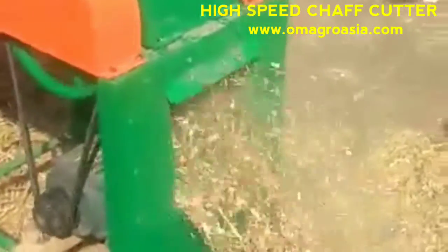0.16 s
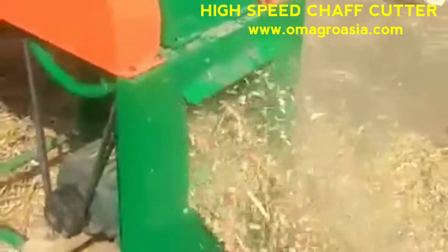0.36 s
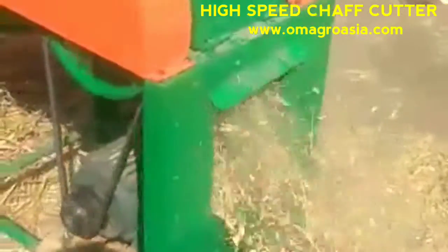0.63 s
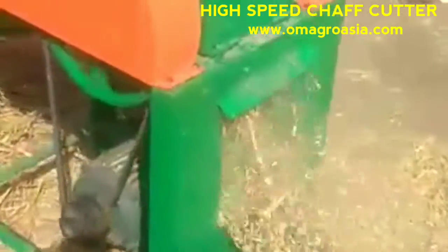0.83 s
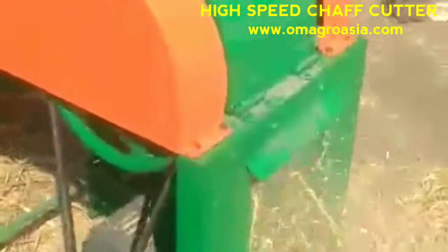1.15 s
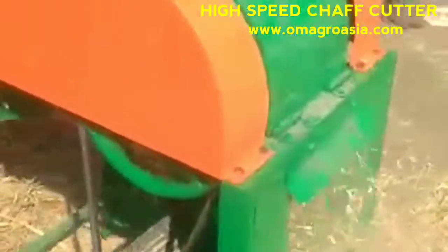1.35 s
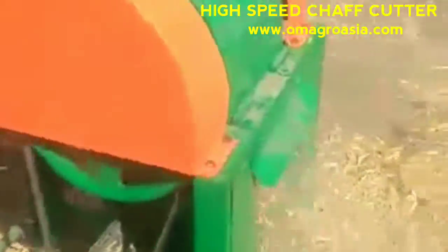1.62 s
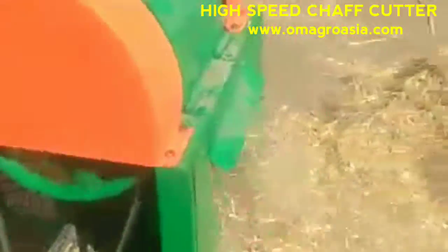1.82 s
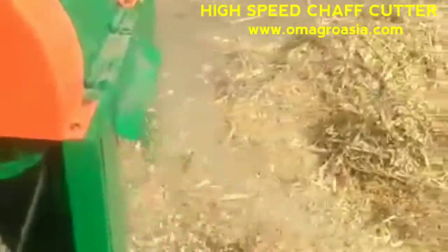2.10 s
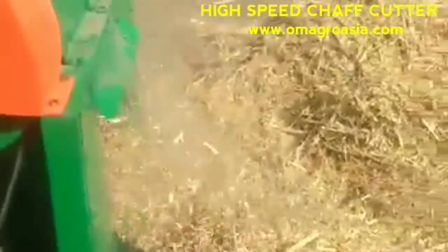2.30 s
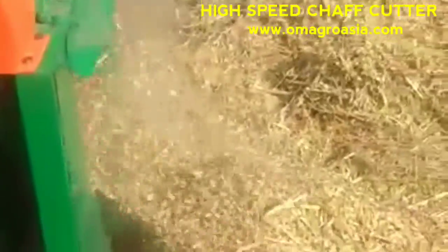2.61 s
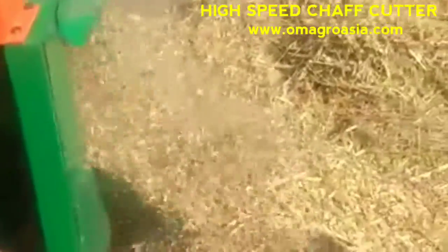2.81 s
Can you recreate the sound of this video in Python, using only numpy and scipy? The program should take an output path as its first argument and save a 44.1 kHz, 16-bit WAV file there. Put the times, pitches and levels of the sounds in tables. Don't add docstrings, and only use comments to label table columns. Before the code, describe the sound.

Farm chaff cutter running steadily, fast metallic chopping over airy straw blast and high whining belt

```python
import sys
import numpy as np
from scipy import signal
from scipy.fft import rfft, irfft
from scipy.io import wavfile
from scipy.ndimage import uniform_filter1d

SR = 44100
rng = np.random.default_rng(int(sys.argv[2]) if len(sys.argv) > 2 else 0)


def transcribe(signal):
    frames = np.atleast_2d(signal).T
    limited = np.clip(frames, -1, 1)
    pcm = np.round(limited * 32767).astype(np.int16)
    wavfile.write(sys.argv[1], SR, pcm)


def to_linear_factor(level_db):
    exponent = np.asarray(level_db, float) / 20
    return 10 ** exponent


N = 130095

# start_s, blow_db, load_db
KNIFE_A = [(0.0014, -20.5, 1.5), (0.1306, -23, 2.5), (0.2604, -24, 1.5), (0.3872, -26, 0.5),
           (0.515, -26.5, 2), (0.6459, -24, 0), (0.7754, -24, 3.5), (0.9063, -24.5, 0), (1.0339, -21.5, -3),
           (1.164, -28, 0), (1.2871, -24.5, -2), (1.42, -25.5, 1), (1.5468, -28, -0.5), (1.678, -23, -1),
           (1.8059, -24.5, -0.5), (1.935, -24.5, -0.5), (2.0646, -26.5, -0.5), (2.191, -36, 0),
           (2.321, -33, -0.5), (2.4544, -25.5, -2), (2.5806, -24.5, 1), (2.7111, -22.5, -2),
           (2.841, -30, 1.5)]
# start_s, blow_db, load_db
KNIFE_B = [(0.0647, -22, -3), (0.1929, -23, 0.5), (0.3242, -21, -0.4), (0.4539, -22, -3),
           (0.5839, -26, -1.5), (0.7121, -26, -1), (0.839, -26.5, -1.8), (0.9696, -25.5, -0.4),
           (1.098, -26, -2.8), (1.2253, -25, -3), (1.3551, -29, -2.1), (1.4845, -26, -2),
           (1.612, -30, -0.6), (1.7417, -31, -0.5), (1.8735, -31, -0.5), (1.9999, -25, -1.5),
           (2.1282, -25.5, 0.1), (2.2566, -24, -2.5), (2.381, -31, -3), (2.509, -28, -0.3),
           (2.6464, -27.5, -1.1), (2.7739, -25, -1.6), (2.908, -23.5, 0.3)]
# start_s, level_db
KNOTS = [(0.045, -32), (.152, -31), (.531, -33), (.552, -25.5), (0.68, -29.5), (.894, -33), (.932, -23.5),
         (1.124, -29), (1.314, -30), (1.461, -22.5), (1.592, -37), (1.911, -29), (2.047, -29), (2.231, -40),
         (2.357, -40), (2.425, -39), (2.496, -38)]
# time_s, load_db
FEED = [
    (0, 0.44),
    (.7, -0.2),
    (1.2, 1.5),
    (1.6, 1.74),
    (2.1, 2.5),
    (2.6, 2.5),
    (2.95, 0.9),
]
# freq_hz, level_db
BLOW_SPECTRUM = [(150, -29), (300, 3), (1000, 3), (1450, -4), (1750, -9.5), (6000, -24.5), (10000, -33.5),
                 (15500, -49)]
# freq_hz, t60_s
BLOW_DECAY = [(200, 0.2), (1000, 0.028), (4000, 0.12), (12000, 0.038)]
# freq_hz, level_db, t60_s
ANVIL_MODES = [(292.5, 2, 0.046), (419, -5.5, 0.052), (836, -6.5, 0.015), (999, -1, 0.03),
               (1174, -16.5, 0.04), (1410, -11.5, 0.016), (1797, -5, 0.031)]
# freq_hz, width_hz, level_db
CASING_MODES = [(100, 22, -26), (197, 28, -2.5), (228, 35, -4), (280, 16, 2.5), (318, 30, -1.5),
                (357, 30, -3.5), (420, 60, -2.5), (490, 26, -1.5), (560, 55, -7), (695, 65, -9),
                (790, 70, -10), (875, 80, -9.5), (975, 100, -12), (1100, 140, -16.5)]
# time_s, level_db
FACING = [
    (0, 0.5),
    (1.3, 0),
    (1.9, -1.5),
    (2.3, 0.5),
    (2.95, 2.5),
]
# middle_s, pitch_hz, level_db
PANEL_RINGS = [(0.149, 230, -30), (0.149, 316.3, -28.5), (0.269, 274, -29), (0.399, 275, -38),
               (0.529, 284, -32), (0.651, 300.6, -31), (0.659, 486, -36), (0.787, 289, -31.5),
               (.84, 282, -30), (.91, 286, -47), (1.171, 277, -28.5), (1.24, 318, -31), (1.559, 303, -38),
               (1.691, 317, -25.5), (1.81, 220, -38), (1.84, 194, -28), (1.93, 408.6, -29),
               (2.049, 191, -29), (2.12, 488, -23.5), (2.149, 314, -33), (2.171, 194, -27),
               (2.24, 492, -25.5), (2.281, 304, -29.5), (2.29, 195, -27.5), (2.37, 492, -29),
               (2.41, 215, -30.5), (2.5, 480, -26.5), (2.53, 202, -32), (2.609, 218, -33), (2.68, 189, -34),
               (2.72, 415, -35), (2.74, 224.6, -28), (2.85, 412, -37), (2.87, 229, -29)]
# middle_s, length_s, level_db, pitch_hz, overtone_gain_db
SQUEALS = [(.49, .08, -52, 3900, -3), (.63, 0.11, -53, 3996, -14), (.69, 0.073, -54, 3890, -7),
           (.92, 0.092, -55, 3965, -11), (.97, .04, -50.5, 3900, 19), (1.02, 0.058, -34.5, 3925, -1),
           (1.07, 0.057, -40, 3928, -2), (1.125, 0.079, -39.5, 3920, 2), (1.26, .06, -50, 3925, -7),
           (1.34, 0.092, -39.5, 3903, -7), (1.395, 0.025, -34.5, 4000, -4), (1.455, .07, -37, 3870, 0),
           (1.555, 0.088, -34, 3960, 1.5), (1.645, 0.11, -33, 3926, 3), (1.77, 0.034, -43, 3940, -11),
           (1.81, 0.032, -46, 3925, -9), (1.925, 0.076, -37.5, 3932, 14), (1.995, 0.055, -38, 3935, 9),
           (2.07, 0.098, -44, 3935, 5), (2.15, .04, -56, 3980, 3), (2.32, 0.064, -49, 3905, -5),
           (2.385, 0.078, -51, 3926, 0), (2.445, 0.036, -41, 3916, -5), (2.475, 0.022, -45, 3980, 6),
           (2.51, 0.04, -39.5, 3900, 3), (2.555, .03, -52, 3915, 0), (2.6, .04, -44, 3853, 0),
           (2.636, 0.023, -34, 3895, 0), (2.668, 0.032, -37, 3880, -7), (2.765, .06, -46, 3915, 13),
           (2.83, 0.031, -38.5, 3915, 0), (2.875, 0.048, -37, 3966, 5.5), (2.935, 0.031, -43, 3890, 8)]
# multiple, level_db
SQUEAL_OVERTONES = [(2, -23), (3, -36), (4, -35)]
# time_s, level_db
SLIP = [(0, -47), (.42, -57), (.7, -51), (.74, -58), (.88, -60), (.93, -53), (1.2, -46.5), (1.7, -41),
        (2.2, -45.5), (2.4, -43.5), (2.95, -44.5)]
# multiple, level_db
SLIP_PARTIALS = [(1, -2.5), (2, -23.5), (3, -31), (4, -34)]
# freq_hz, level_db
RUSH_SPECTRUM = [(140, -14), (400, 4.5), (1000, -6.5), (1450, -9.5), (1750, -10.5), (4700, -17),
                 (6500, -25.5), (15500, -34.5)]
# start_s, level_db
CRACKS = [
    (.0003, -35),
    (.3263, -45),
    (.7746, -48),
    (.969, -45),
    (1.4379, -42),
    (1.7394, -44),
    (2.0786, -40),
    (2.1598, -43),
    (2.7138, -41),
]
# freq_hz, likeness_0_to_1
LIKENESS = [(70, .45), (170, .96), (480, .93), (620, .55), (820, .97), (1150, .96), (1500, .35),
            (2000, .86), (3600, .86), (5400, .97), (7100, .85), (10700, .62), (13500, .15)]
# freq_hz, extra_phase_rad, left_over_right_db
PORTS = [(70, 1.3, 0), (170, 2.65, 1.5), (345, 1.5, -.4), (480, .4, 1.3), (600, .1, 6.7), (670, .9, 3.3),
         (1200, -.25, -1.5), (1400, -1.5, -.3), (1723, .3, -3.2), (2100, 0, 0)]

HZ = np.fft.rfftfreq(N, 1 / SR)
TIME_S = np.arange(N) / SR


def evened(x):
    return x / np.sqrt(np.mean(x ** 2) + 1e-20)


def read(points, hz, axis=1):
    p = np.array(points)
    return np.interp(np.log(hz + 1), np.log(p[:, 0] + 1), p[:, axis])


def curve(points):
    return np.interp(TIME_S, *np.transpose(points))


def coloured(x, gain):
    return irfft(rfft(x) * gain, N)


def slow(hz):
    return evened(coloured(rng.standard_normal(N), 1 / (1 + (HZ / hz) ** 4)))


def pair(gain, patchy_db):
    same = np.clip(read(LIKENESS, HZ), 0, 1)
    a, b = rfft(rng.standard_normal((2, N)))
    spectra = np.array([a, same * a + np.sqrt(1 - same ** 2) * b])
    grid = signal.stft(irfft(gain * spectra, N), nperseg=256)[2]
    patches = rng.standard_normal(grid.shape[::-1][:2]).T
    patches = uniform_filter1d(patches, 5, 0)
    patches = evened(uniform_filter1d(patches, 8, 1))
    noise = signal.istft(grid * to_linear_factor(patchy_db * patches), nperseg=256)[1]
    return evened(noise[:, :N])


def load():
    sag_db_per_s, level_at_s = -9, 0.03
    start_s, _, load_db = np.array(sorted(KNIFE_A + KNIFE_B)).T
    last = np.maximum(np.searchsorted(start_s, TIME_S) - 1, 0)
    since_s = TIME_S - start_s[last]
    stepped_db = load_db[last] + sag_db_per_s * (since_s - level_at_s)
    return uniform_filter1d(stepped_db, size=130) + curve(FEED)


def blows():
    blow_gain_db = 1.26
    noise = pair(to_linear_factor(read(BLOW_SPECTRUM, HZ)), patchy_db=0.8)
    t = np.arange(5000) / SR
    train, out = np.zeros(N), np.zeros((2, N))
    for start_s, blow_db, _ in KNIFE_A + KNIFE_B:
        train[max(round(start_s * SR), 0)] = to_linear_factor(blow_db + blow_gain_db)
    for band_hz, t60_s in BLOW_DECAY:
        share = read([(hz, hz == band_hz) for hz, _ in BLOW_DECAY], HZ)
        shape = (1 - np.exp(-t * band_hz / 1.64)) * to_linear_factor(-60 * t / t60_s)
        out += coloured(noise, share) * signal.oaconvolve(train, shape)[:N]
    return out


def knocks():
    knock_gain_db, lead_s, spread_db = -1.5, 0.002, 3.95
    out, t = np.zeros(N + 3000), np.arange(3000) / SR
    rows = KNIFE_A + KNIFE_B + KNOTS
    for row, luck in zip(rows, rng.random((len(rows), 2 * len(ANVIL_MODES)))):
        ring = np.zeros(3000)
        for k, (mode_hz, mode_db, t60_s) in enumerate(ANVIL_MODES):
            level = to_linear_factor(mode_db - 60 * t / t60_s + spread_db * luck[k])
            pitch_hz = mode_hz * (0.963 + 0.077 * luck[-1 - k])
            ring += level * np.sin(2 * np.pi * (pitch_hz * t + 0.2 * luck[k - 1]))
        at = max(round((row[0] - lead_s) * SR), 0)
        attack = np.minimum(t / lead_s, 1)
        out[at:at + 3000] -= to_linear_factor(row[1] + knock_gain_db) * attack * ring
    return out[:N]


def casing(load_db):
    level_db, low_panels_hz = -30.5, 250
    power = np.zeros(len(HZ))
    for mode_hz, width_hz, mode_db in CASING_MODES:
        power += (to_linear_factor(mode_db) / (1 + ((HZ - mode_hz) / width_hz * 2) ** 2)) ** 2
    hum = pair(np.sqrt(power), patchy_db=0.5)
    low = coloured(hum, HZ < low_panels_hz)
    return to_linear_factor(level_db + load_db) * (hum - low + to_linear_factor(curve(FACING)) * low)


def rings():
    rise_s, t60_s = 0.018, 0.18
    out, t = np.zeros(N + 9000), np.arange(9000) / SR
    shape = (1 - np.exp(-(t / rise_s) ** 2)) * to_linear_factor(-60 * t / t60_s)
    shape = shape / shape.max()
    for (middle_s, pitch_hz, level_db), phase in zip(PANEL_RINGS, rng.random(len(PANEL_RINGS))):
        at = round((middle_s - 1.6 * rise_s) * SR)
        out[at:at + 9000] += to_linear_factor(level_db) * shape * np.sin(2 * np.pi * (pitch_hz * t + phase))
    return out[:N]


def squeal():
    overtone_sag_hz, wander_hz, slip_width_hz = 12, 17, 107
    level, bright = np.zeros(N), np.zeros(N)
    for middle_s, length_s, level_db, _, over_db in SQUEALS:
        place = np.clip((TIME_S - middle_s) / length_s, -.5, .5)
        swell = to_linear_factor(level_db) * np.cos(np.pi * place) ** 1.48
        level += swell
        bright += to_linear_factor(over_db) * swell
    flutter = np.sqrt(2) * to_linear_factor(2.3 * slow(80))
    pitch_hz = curve([(row[0], row[3]) for row in SQUEALS]) + wander_hz * slow(140)
    turns = np.cumsum(pitch_hz) / SR
    sagged = turns - overtone_sag_hz * TIME_S

    grips = level * np.sin(2 * np.pi * turns)
    for k, level_db in SQUEAL_OVERTONES:
        grips += to_linear_factor(level_db + 0.5 * slow(90)) * bright * np.sin(2 * np.pi * k * sagged)

    slip = np.zeros(N)
    for k, level_db in SLIP_PARTIALS:
        fuzz = 1 + slow(k * slip_width_hz) + 1j * slow(k * slip_width_hz)
        phase = turns if k == 1 else sagged
        slip += to_linear_factor(level_db) * (fuzz * np.exp(2j * np.pi * k * phase)).imag
    return flutter * grips + to_linear_factor(curve(SLIP)) * slip


def rush(load_db):
    level_db, load_follow, waver_db = -36, 1.16, 1.31
    gain = to_linear_factor(read(RUSH_SPECTRUM, HZ)) * (HZ > 85)
    level = to_linear_factor(level_db + load_follow * load_db + waver_db * slow(60))
    return level * pair(gain, patchy_db=0.8)


def chips(load_db):
    level_db, load_follow, chips_per_s, left_db = -72, 1.2, 550, 3
    size = to_linear_factor(3.4 * np.minimum(rng.exponential(1, N), 6))
    size = size * (rng.random(N) < chips_per_s / SR)
    kind = rng.integers(0, 16, N)
    t, out = np.arange(200) / SR, np.zeros((2, N))
    for k, hz in enumerate(np.geomspace(2500, 12500, 16)):
        tick = np.sin(2 * np.pi * hz * t) * np.exp(-t * hz / 2.9) * (hz / 8000) ** 0.3
        out += to_linear_factor([[left_db], [0]]) * signal.oaconvolve(size * (kind == k), tick)[:N]
    return to_linear_factor(level_db + load_follow * load_db) * evened(out)


def cracks():
    tone_hz, decay_s, noise_share = 11700, 0.00066, 0.88
    out, t = np.zeros(N + 300), np.arange(300) / SR
    for (start_s, level_db), noise in zip(CRACKS, rng.standard_normal((len(CRACKS), 300))):
        at = round(start_s * SR)
        burst = np.sin(2 * np.pi * tone_hz * t) + noise_share * np.diff(noise, prepend=0)
        out[at:at + 300] += to_linear_factor(level_db) * burst * np.exp(-t / decay_s)
    return out[:N]


def scene():
    load_db = load()
    cutter = blows() + knocks() + casing(load_db) + rings()
    chute = rush(load_db) + chips(load_db) + cracks()
    return cutter + squeal() + chute


def low_pass(x):
    return signal.sosfilt(signal.butter(12, 15800, fs=SR, output="sos"), x)


def record(dry):
    edge_hz, bass_cut_hz, port_delay_s = 15800, 92, 0.000562
    thud_db, thud_hz = 21, 75
    shrill = coloured(dry, HZ > 3500)
    thud = coloured(shrill ** 2, HZ / (HZ + 25) / (1 + (HZ / thud_hz) ** 4))
    band = np.clip((edge_hz - HZ) / 160, 0, 1) / np.sqrt(1 + (bass_cut_hz / (HZ + 1)) ** 12)
    heard = coloured(dry, band) + to_linear_factor(thud_db) * thud
    lag_rad = 2 * np.pi * HZ * port_delay_s - np.pi + read(PORTS, HZ)
    tilt = to_linear_factor(read(PORTS, HZ, axis=2) / 2)
    left = coloured(heard[0], tilt * np.exp(-1j * lag_rad))
    right = coloured(heard[1], 1 / tilt)
    return low_pass(np.array([left, right]))


dry = scene()
out = record(dry)
transcribe(out)
```